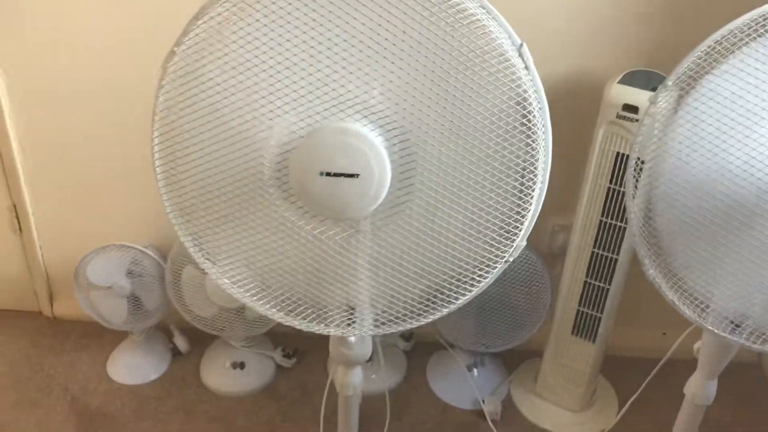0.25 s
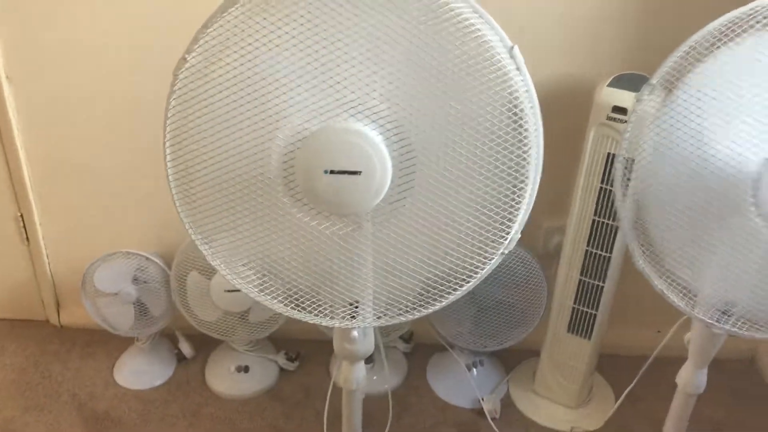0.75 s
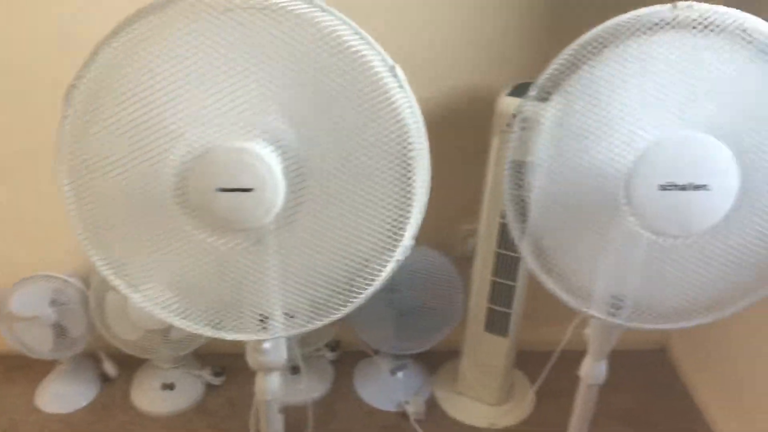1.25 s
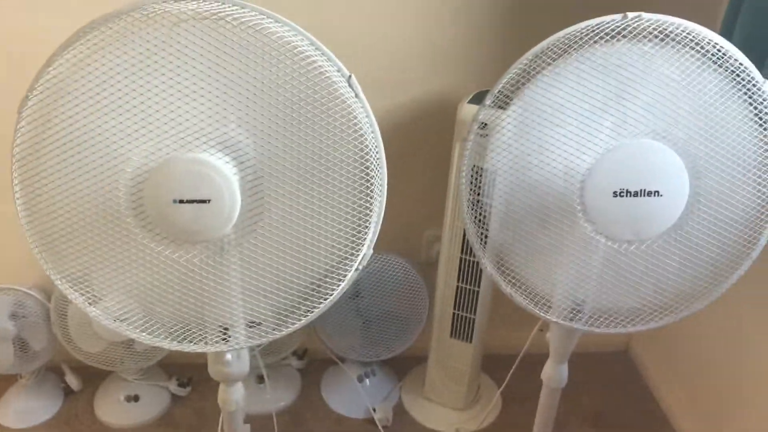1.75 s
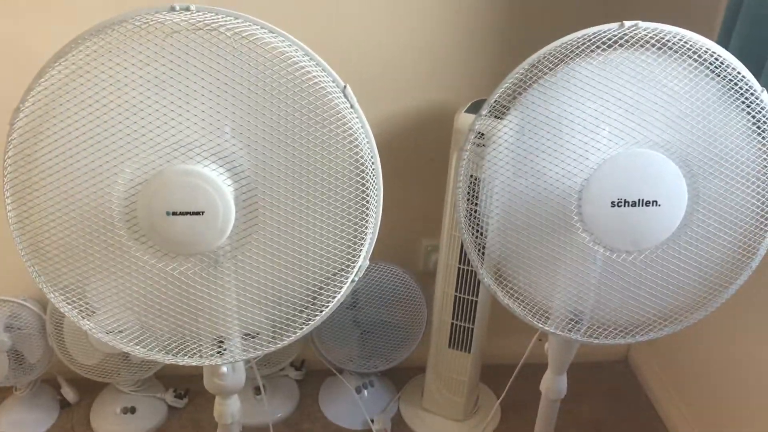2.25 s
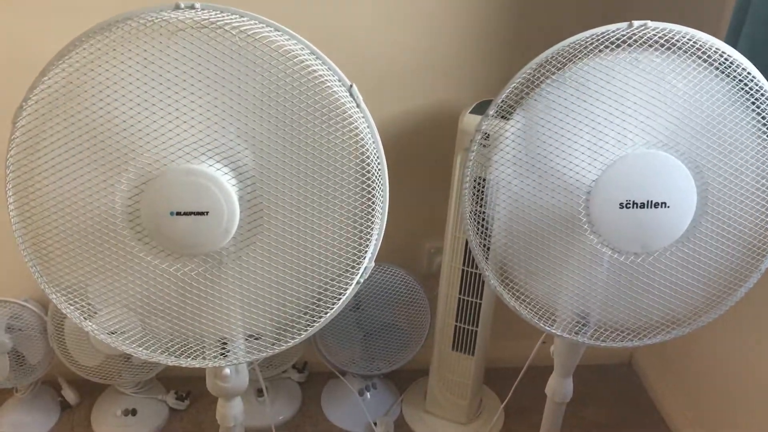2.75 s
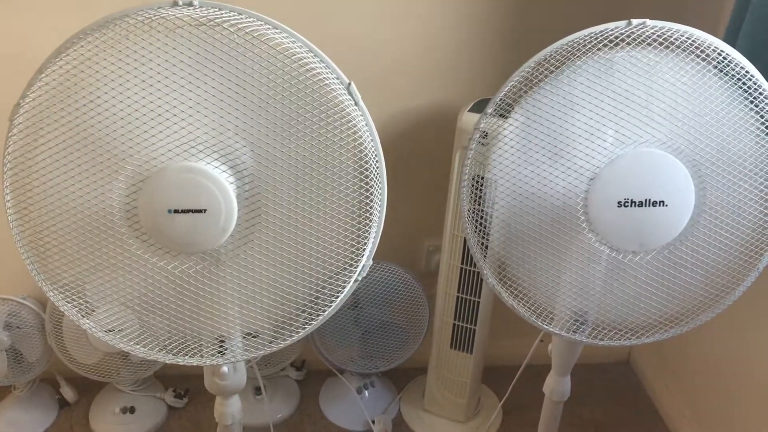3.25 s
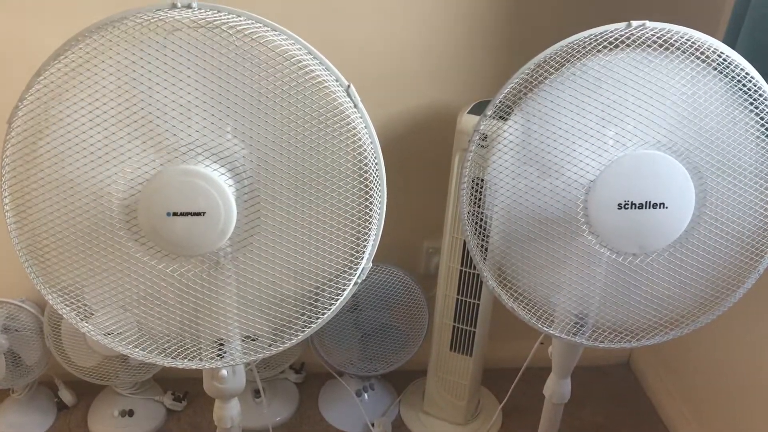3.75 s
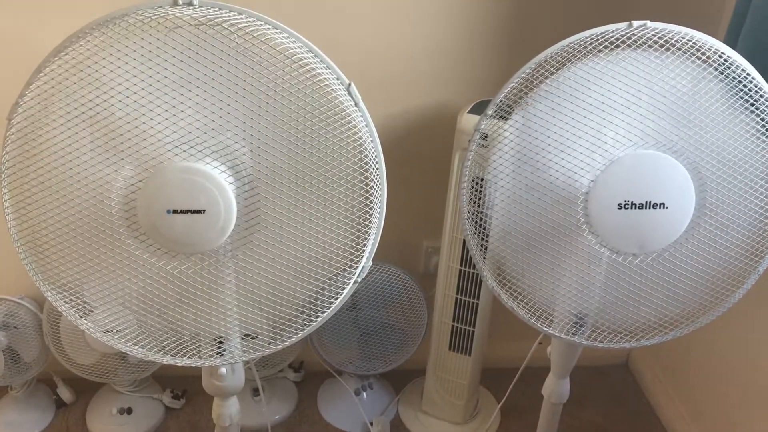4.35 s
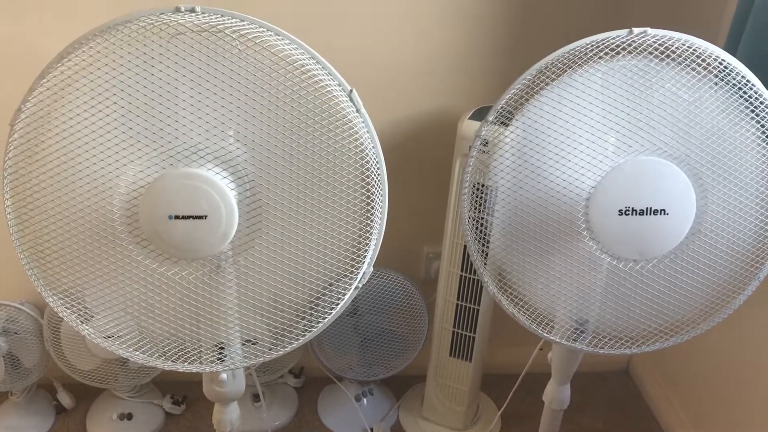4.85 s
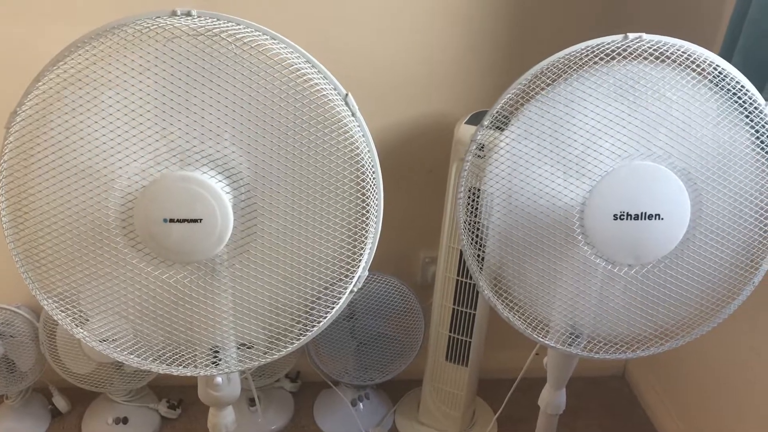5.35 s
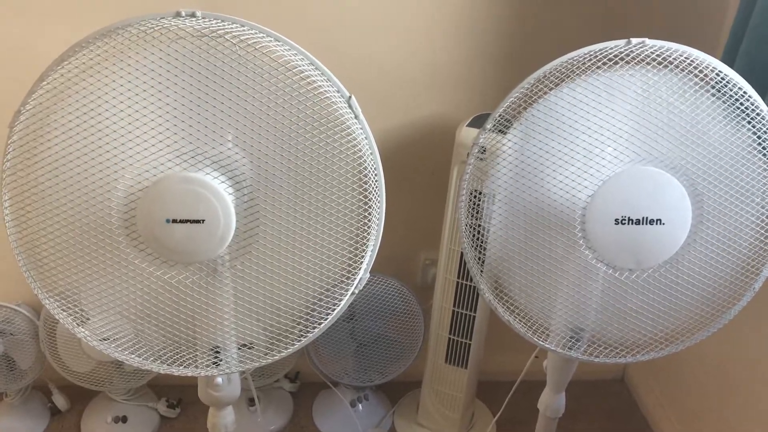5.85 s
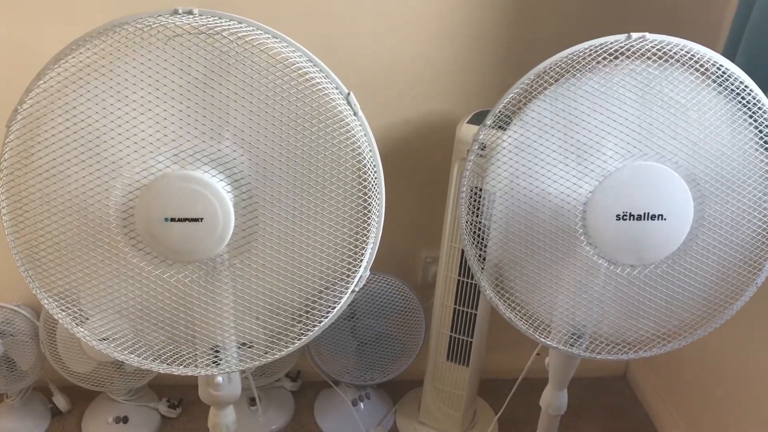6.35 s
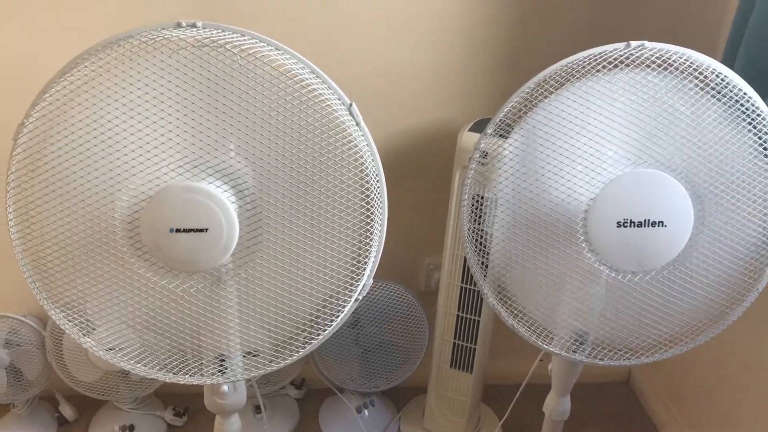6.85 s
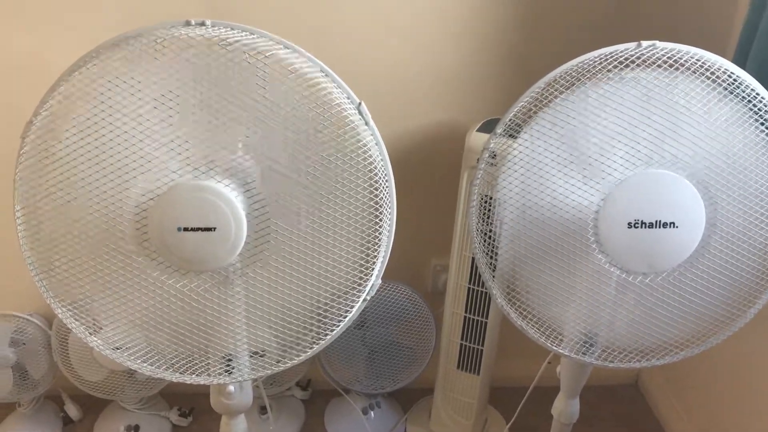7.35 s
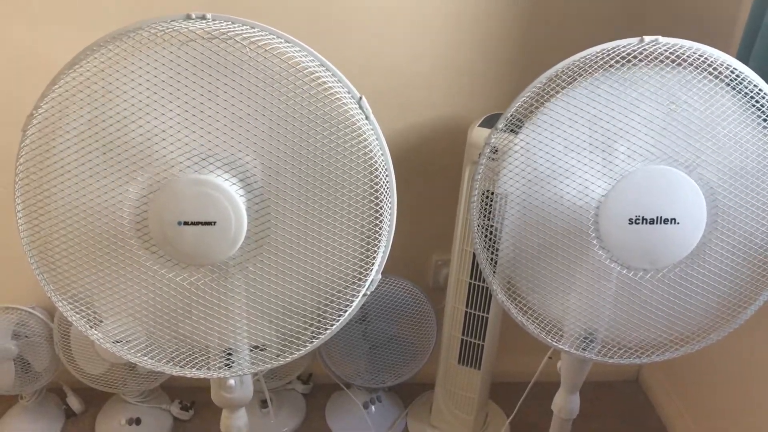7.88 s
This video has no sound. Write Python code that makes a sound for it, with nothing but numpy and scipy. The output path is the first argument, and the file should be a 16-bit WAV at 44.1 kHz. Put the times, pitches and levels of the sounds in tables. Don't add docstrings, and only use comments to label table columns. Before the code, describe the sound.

Two pedestal fans blow at a phone held close in a room, so the wind on its microphone dominates. From 0 to 1.3 s a faint, smooth blade hiss lies under rapid muffled knocks, strongest near 0.26 and 0.6-0.8 s. Around 0.85 s a finger gives a loud short scrape with small squeaks; a duller rub follows at 1.15 s. The hiss loses its treble at about 1.1 s and fades out by 2 s. Irregular low rumble and flutter remain, with thumps at 2.2, 2.6 and 2.9 s. From 3 to 5.5 s it is sparser: dull thuds at 4.1 and 4.5 s and faint ticks. A hard double knock comes at 5.95 s, a sharp click at 6.5 s, then rumble swells around 7-7.5 s. The heaviest deep thump lands at 7.75 s, and a strong jolt with brief rubs ends it near 8.05 s.

```python
import sys
import numpy as np
from scipy import signal
from scipy.fft import rfft, irfft, next_fast_len
from scipy.io import wavfile
from scipy.ndimage import uniform_filter1d

SR = 44100
rng = np.random.default_rng(int(sys.argv[2]) if len(sys.argv) > 2 else 0)


def boost(x):
    u = np.asarray(x, float) / 20
    return 10 ** u


def waveform_to_disk(signal):
    frames = np.transpose(np.atleast_2d(signal))
    scaled = np.clip(frames, -1, 1) * 32767
    samples = np.round(scaled).astype(np.int16)
    wavfile.write(sys.argv[1], SR, samples)


N = 358091
FFT_LEN = next_fast_len(N)
TIME = np.arange(N) / SR
FREQ = np.fft.rfftfreq(FFT_LEN, 1 / SR) + 1e-3
GUARD_TIGHT_S = 2.1
BREEZE_CALM_DB = -41.5


def on_log(hz, points):
    f, v = np.transpose(points)
    return np.interp(np.log(hz), np.log(f), v)


def shaped(x, response):
    return irfft(rfft(x, FFT_LEN) * response, FFT_LEN)[:N]


def butterworth(hz, order, kind="high", freq=FREQ):
    return signal.freqs(*signal.butter(order, 1, kind, analog=True), freq / hz)[1]


def summed(levels_db):
    return 10 * np.log10(sum(boost(2 * db) for db in levels_db) + 1e-11)


def walk(rate_hz):
    hold = int(SR / rate_hz)
    held = np.repeat(rng.standard_normal(N // hold + 1), hold)
    return 0.98 * uniform_filter1d(uniform_filter1d(held, hold), hold)[:N]


def grains(rate_hz, spread_db, bed):
    size_db = spread_db * np.minimum(rng.exponential(size=N), 4)
    kicks = (rng.random(N) < rate_hz / SR) * boost(size_db) * rng.choice([-1, 1], N)
    return kicks * np.sqrt(SR / rate_hz) + bed * rng.standard_normal(N)


def tilted(source, colour, lo_hz, hi_hz, anchors_hz, moves_db, flicker_db, flicker_hz):
    spectrum = rfft(source, FFT_LEN) * boost(on_log(FREQ, colour))
    inside = (FREQ > lo_hz) & (FREQ < hi_hz)
    spectrum = spectrum * FFT_LEN / np.sqrt(2 * np.sum(np.abs(spectrum[inside]) ** 2))
    place = np.interp(np.log(FREQ), np.log(anchors_hz), np.arange(len(anchors_hz)))
    out = 0
    for k, move_db in enumerate(moves_db):
        share = np.clip(1 - np.abs(place - k), 0, 1)
        band = irfft(spectrum * share, FFT_LEN)[:N]
        out = out + band * boost(move_db + flicker_db * walk(flicker_hz))
    return out


def swell(crest_s, length_s):
    side_s = np.where(TIME < crest_s, 0.38, 0.62) * length_s
    return -9 * np.minimum(np.abs(TIME - crest_s) / side_s, 8) ** 2


# time in seconds, rumble in dB.
DRAUGHT = [(0, -40), (.6, -37.5), (1.2, -37), (1.7, -35), (2.4, -38.5), (3.0, -37.5), (3.6, -42),
           (4.2, -44.5), (4.8, -40.5), (5.05, -45.5), (5.4, -46.5), (5.8, -44), (6.4, -42.5), (6.9, -36),
           (7.4, -34), (7.65, -41), (8.12, -44.5)]
# crest in seconds, length in seconds, rumble in dB,
# flutter in dB re rumble.
PUFFS = [(.06, 0.064, -40.5, 7), (.2, 0.044, -30.5, -4.5), (.272, 0.058, -29, -3.5), (.345, 0.067, -36, -4),
         (.56, 0.13, -28, -6.5), (.78, 0.062, -31, 1.5), (.852, .04, -28, 10), (1.085, .08, -35.5, -5.5),
         (1.19, 0.14, -39.5, -1), (1.38, 0.1, -35.5, -8.5), (1.515, 0.072, -29.5, -6)]
# crest in seconds, length in seconds, rumble in dB.
HEAVES = [(0.703, 0.047, -31), (0.966, .07, -25), (1.33, .06, -36.5), (1.849, 0.12, -38.5),
          (2.54, 0.085, -35.5), (3.224, 0.22, -39.5), (3.93, .1, -39.5), (1.68, 0.12, -41.5),
          (3.3, 0.063, -39), (6.57, 0.083, -43), (6.206, 0.11, -41.5)]
# crest in seconds, length in seconds, rumble in dB,
# flutter in dB re rumble, sizzle in dB re flutter.
GUSTS = [(2.025, 0.099, -26, -7, -18), (2.232, 0.043, -17.5, -11.5, -17), (2.41, 0.04, -31, -4.5, -20.5),
         (2.597, 0.083, -25.5, -9.5, -14.5), (2.882, 0.059, -22.5, -14, -13),
         (3.56, 0.16, -37.5, -16, -14.5), (4.11, 0.034, -17.5, -19.5, -13.5),
         (4.505, .05, -21.5, -24.5, -11), (4.71, 0.07, -35.5, -14.5, -22), (4.815, 0.015, -46.5, -6, -33),
         (5.19, 0.11, -34.5, -19.5, -16), (5.29, 0.028, -33, -6.5, -18.5), (5.42, 0.15, -41, -13.5, -11.5),
         (5.965, 0.06, -25.5, -18, -12), (7.022, 0.075, -29.5, -15.5, -12), (7.178, 0.034, -35, -20, -17.5),
         (7.748, 0.038, -9, -20.5, -11), (7.826, 0.083, -25, -8, -13), (7.94, 0.041, -28.5, -5.5, -14.5),
         (8.04, 0.09, -41, -1.5, -10.5)]
# frequency in Hz, density in dB per Hz.
EDDY_COLOUR = [(15, -36.5), (25, -9), (54, 1), (82, 1), (105, -4), (468, -34.5), (1500, -59)]


def buffeting():
    breeze_db = np.interp(TIME, *np.transpose(DRAUGHT)) + 3 * walk(9)
    upper_db = BREEZE_CALM_DB + 0.6 * (breeze_db - BREEZE_CALM_DB)

    heave_flutter_db, dull_sizzle_db = -19, -15
    dull = PUFFS + [(*heave, heave_flutter_db) for heave in HEAVES]
    gusts = GUSTS + [(*puff, dull_sizzle_db) for puff in dull]
    crests = [(db + swell(s, length), flutter, sizzle) for s, length, db, flutter, sizzle in gusts]

    rumble_db = summed([breeze_db] + [db for db, _, _ in crests])
    rumble_lag_s = 0.01
    rumble_db = np.interp(TIME - rumble_lag_s, TIME, rumble_db)
    flutter_db = summed([upper_db - 23] + [db + flutter for db, flutter, _ in crests])
    sizzle_db = summed([upper_db - 36.5] + [sum(crest) for crest in crests])
    sizzle_db = sizzle_db + np.interp(TIME, [1.1, 1.9], [-12, 0])
    flutter_db, sizzle_db = flutter_db + 19.0, sizzle_db + 32.5

    anchors_hz = [90, 160, 280, 500, 850, 2500]
    moves_db = [rumble_db, 0.5 * (rumble_db + flutter_db), flutter_db,
                0.5 * (flutter_db + sizzle_db), sizzle_db, sizzle_db - 0.7]
    colour = EDDY_COLOUR + [(3000, -71.0), (8000, -88), (16000, -93.5)]
    tumble = boost(2.5 * walk(40))
    eddies = grains(400, spread_db=3.5, bed=2.2) * tumble
    return tilted(eddies, colour, 27, 200, anchors_hz, moves_db, flicker_db=3.0, flicker_hz=30)


# frequency in Hz, density in dB per Hz.
HISS_COLOUR = [(300, -20), (600, -2), (1160, -2.5), (1750, -5), (5470, -19.5), (8070, -16), (10100, -28),
               (14000, -36)]


def blade_hiss():
    guard_shuts_s, treble_shuts_s, treble_fade_s = 1.31, 1.07, 0.04
    open_db, leak_db, fade_db_per_s = -68, -86.5, -59
    level_db = np.maximum(open_db + fade_db_per_s * np.maximum(TIME - guard_shuts_s, 0), leak_db)
    shut = np.clip((TIME - treble_shuts_s) / treble_fade_s, 0, 1)
    treble_db = -14.5 * shut
    bass_db = 10 * shut
    moves_db = [bass_db, 0, 0.6 * treble_db, treble_db]
    air = rng.standard_normal(N) * (TIME < GUARD_TIGHT_S)
    hiss = tilted(air, HISS_COLOUR, 900, 2500, [400, 1200, 4000, 8000], moves_db, 0.7, 12)
    return boost(level_db) * hiss


STEP_LEN = 2048
STEP_FREQ = np.fft.rfftfreq(STEP_LEN, 1 / SR)


def vented(kicks):
    return shaped(kicks, SR / (2 * np.pi) * butterworth(72, order=4) / (1j * FREQ + 76))


def steps(events):
    out = np.zeros(N + STEP_LEN)
    for start_s, db, edge in events:
        start = int(start_s * SR)
        kick = irfft(edge / (1 + 1j * STEP_FREQ / 9000))
        out[start:start + STEP_LEN] += rng.choice([-1, 1]) * boost(db) * kick
    return vented(out[:N])


# start in seconds, peak
# in dB, dullness 0-1.
KNOCKS = [(0.042, -21.5, 0.6), (0.09, -22, 0.7), (0.192, -32, 0.6), (0.257, -9.5, 0.67), (0.318, -33, 0.4),
          (0.369, -20.5, 0.8), (0.538, -25.5, 0.75), (0.565, -14, 0.69), (0.612, -20, 0.76),
          (0.691, -23.5, 0.6), (0.761, -19.5, 0.73), (0.788, -13.5, 0.55), (0.974, -34, 0.6),
          (1.278, -17, 0.98), (1.497, -21, 0.76), (1.592, -37.5, 0.1), (4.816, -33.5, 0.8),
          (2.238, -9.5, 0.9),
    (2.593, -13.5, 1),
    (2.655, -16, 0.94),
    (2.876, -19.5, 0.9),
    (4.11, -16.5, 0.96),
    (4.507, -21.5, 0.86),
    (5.955, -9, 0.99),
    (7.741, -8, 0.88),
    (7.752, -3, 0.99),
    (7.852, -12, 0.91),
]


def knocks():
    events = []
    for start_s, peak_db, dullness in KNOCKS:
        edge_hz = 650 - 500 * np.clip(dullness, 0, 1)
        edge = butterworth(edge_hz, order=4, kind="low", freq=STEP_FREQ)
        events.append((start_s, peak_db + 9.5, edge))
    return steps(events)


# touch in seconds, rise in seconds, hold in seconds, scrape in dB,
# squeak in dB re scrape.
SCUFFS = [
    (0.758, .04, 0.078, -72, 8),
    (0.809, 0.012, 0.044, -65, 12.5),
    (.851, 0.019, 0.007, -16.5, -14),
    (0.872, .02, 0.028, -52.5, 4.5),
    (0.916, .004, 0.011, -63.5, 19),
    (.945, .004, .015, -82.5, 5),
    (1.151, .02, 0.085, -54, -33),
    (8.053, 0.0036, 0.0028, -47.5, -19),
    (8.08, .015, 0.0091, -56.5, -32.5),
    (8.098, .004, 0.0084, -56.5, -21.5),
]
# frequency in Hz, density in dB per Hz.
SCUFF_COLOUR = [(88, -21.5), (150, 5.5), (234, -6), (332, -12.5), (736, -6.5), (1060, -26.5), (1340, -14.5),
                (4140, -21), (15500, -36)]


def scuffs():
    touches_db = []
    for touch_s, rise_s, hold_s, db, _ in SCUFFS:
        before_db = 35 / rise_s * np.maximum(touch_s - TIME, 0)
        after_db = 1200 * np.maximum(TIME - touch_s - hold_s, 0)
        touches_db.append(db - before_db - after_db)
    scrape_db = summed(touches_db)
    squeak_db = summed(db + row[-1] for db, row in zip(touches_db, SCUFFS)) - scrape_db
    air_db = np.maximum(squeak_db - 7, -23.5)

    ref_db = on_log([2000, 8000, 13000], SCUFF_COLOUR)
    squeak_db = squeak_db - (ref_db[1] - ref_db[0]) + 0.8
    air_db = air_db - (ref_db[2] - ref_db[0]) - 0.8
    dull_db = np.minimum(0, squeak_db)
    moves_db = [-3.0 - 0.34 * dull_db, 0, 0.39 * dull_db, squeak_db, air_db]
    anchors_hz = [500, 1500, 4600, 8300, 12000]
    jerks = grains(3000, spread_db=3.0, bed=1.1)
    rub = tilted(jerks, SCUFF_COLOUR, 900, 4900, anchors_hz, moves_db, flicker_db=2.0, flicker_hz=170)
    return boost(scrape_db) * rub


def stray_ticks():
    rate_hz, level_db, edge_hz = 15, -46.5, 300
    kicks = grains(rate_hz, spread_db=2.5, bed=0) * np.sqrt(rate_hz / SR) * boost(level_db)
    draught_db = np.interp(TIME, *np.transpose(DRAUGHT)) - BREEZE_CALM_DB
    kicks = kicks * boost(draught_db) * (TIME > GUARD_TIGHT_S)
    return vented(shaped(kicks, 1 / (1 + 1j * FREQ / edge_hz)))


# start in seconds, size in dB, edge in Hz.
JUMPS = [(2.4076, -23, 121), (2.8245, -17, 113.9), (3.04, -13, 120.2), (3.5213, -25, 189),
         (3.5762, -18, 112.5), (4.106, -15, 112.9), (4.289, -45, 301), (4.3983, -21.5, 119.5),
         (4.7339, -27.5, 118), (4.949, -31, 120.9), (5.1145, -36, 300), (5.2125, -34.5, 199),
         (5.282, -14, 116.6), (5.949, -5, 218.5), (5.963, -15, 120.5), (5.981, -9, 120.2),
         (6.5135, -29, 119.3), (6.5333, -4.5, 305), (6.598, -50.5, 455), (6.7888, -29.5, 201.8),
         (7.072, -25, 121), (7.1678, -10, 113), (7.1849, -20.5, 117.3), (7.694, -27.5, 119.4),
         (7.7386, -21, 120.3), (7.7444, -13, 201), (7.7523, -22.5, 300), (7.958, -33, 293),
         (8.056, -2.5, 116), (8.104, -20.5, 121)]


def jumps():
    s = 1j * STEP_FREQ
    return steps([(start_s, db, (1 + s / 1220) / (1 + s / hz) / (1 + s / (12 * hz)))
                  for start_s, db, hz in JUMPS])


def scene():
    return (buffeting() + blade_hiss() + knocks() + scuffs() + stray_ticks() + jumps())[None]


# frequency in Hz, density in dB per Hz.
SELF_NOISE_COLOUR = [(400, -34), (900, 1), (2000, 1), (6000, -5), (10000, -6), (16000, -7)]


def self_noise():
    noise = rng.standard_normal(N)
    return boost(-77.5) * tilted(noise, SELF_NOISE_COLOUR, 2000, 15500, [2000, 8000], [0, 0], 0.4, 10)


SPLITTER_HZ = [
    34.5,
    740,
    900,
]


def low_cut_and_split(x):
    lag = np.prod([(hz - 1j * FREQ) / (hz + 1j * FREQ) for hz in SPLITTER_HZ], axis=0)
    return shaped(x, lag * butterworth(40, order=6))


def roll_off(x):
    return signal.sosfilt(signal.butter(12, 16410, fs=SR, output="sos"), x)


def record(dry):
    top_hz = 15830
    mix = shaped(low_cut_and_split(dry[0]) + self_noise(), FREQ < top_hz)
    return roll_off(mix[None])


dry = scene()
out = record(dry)
waveform_to_disk(out)
```